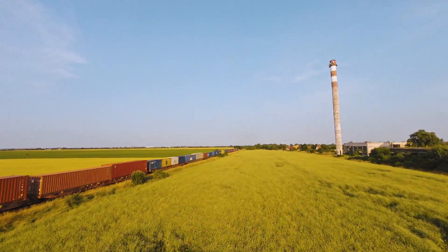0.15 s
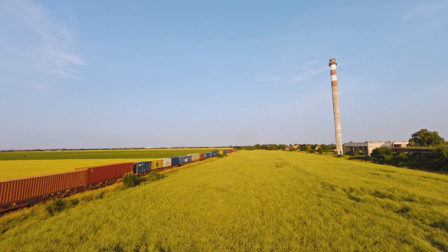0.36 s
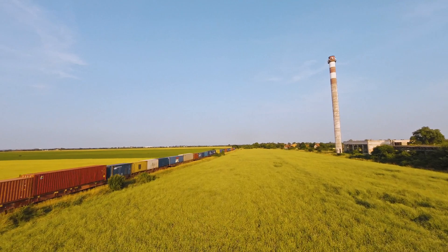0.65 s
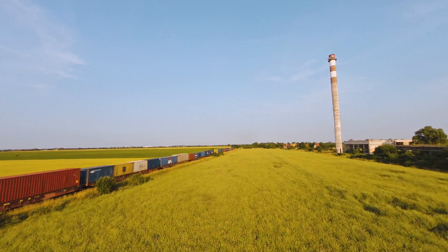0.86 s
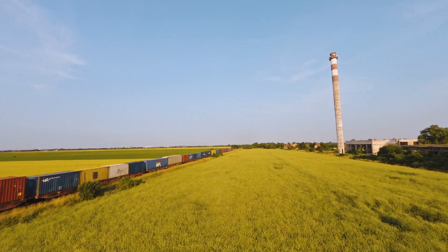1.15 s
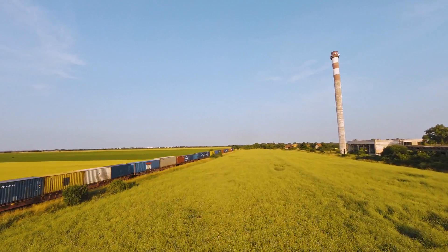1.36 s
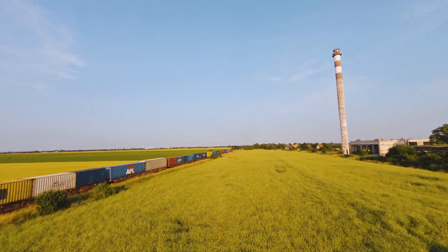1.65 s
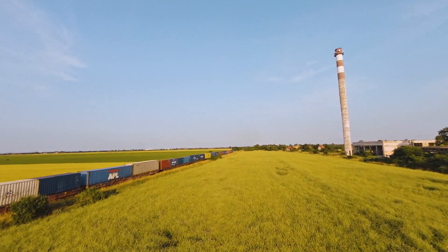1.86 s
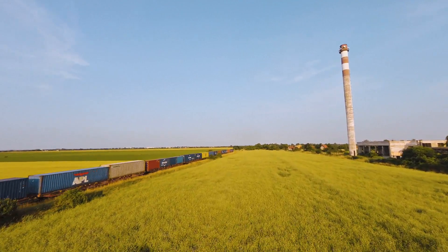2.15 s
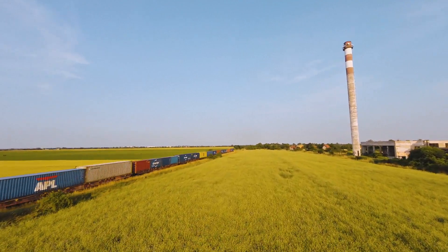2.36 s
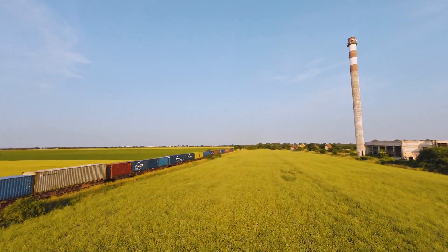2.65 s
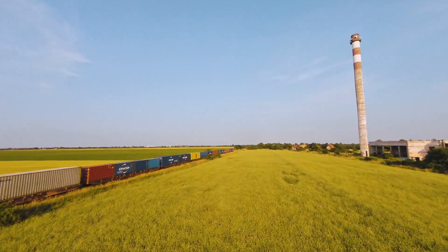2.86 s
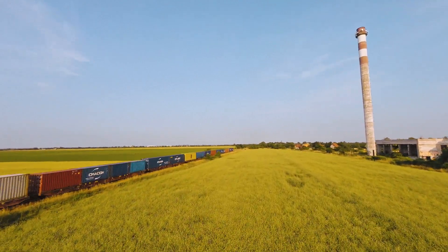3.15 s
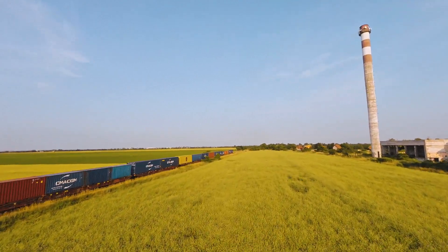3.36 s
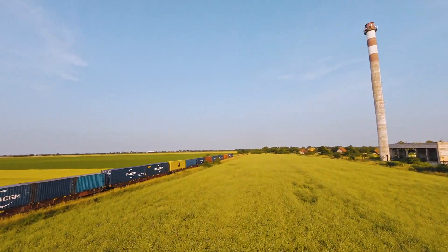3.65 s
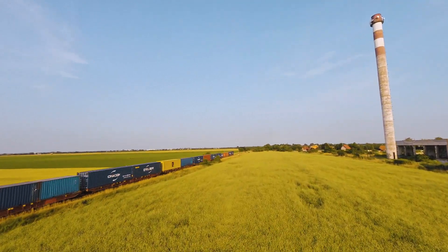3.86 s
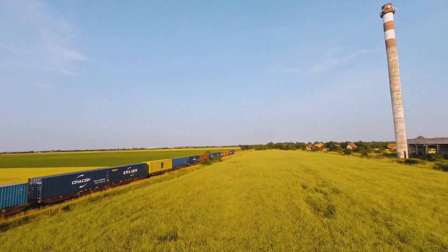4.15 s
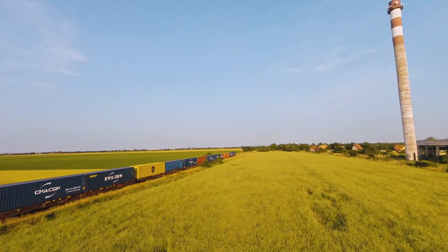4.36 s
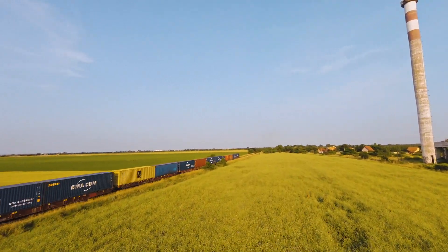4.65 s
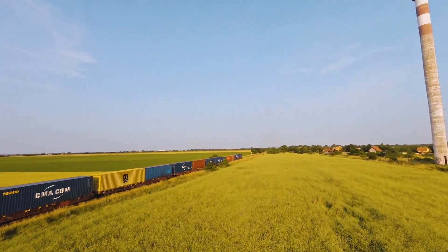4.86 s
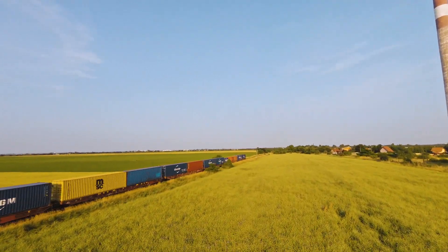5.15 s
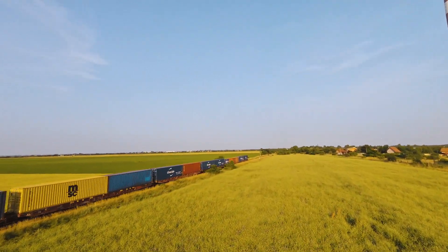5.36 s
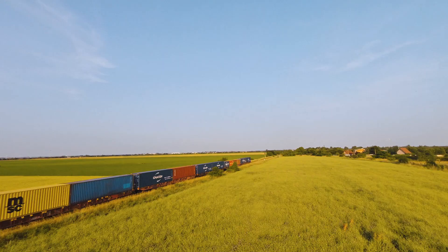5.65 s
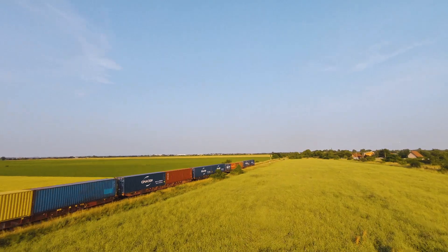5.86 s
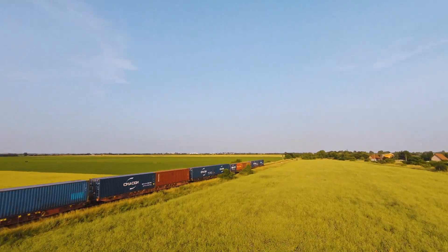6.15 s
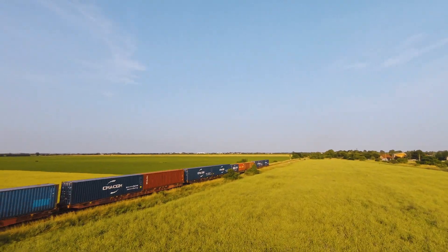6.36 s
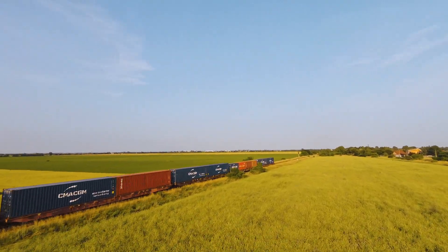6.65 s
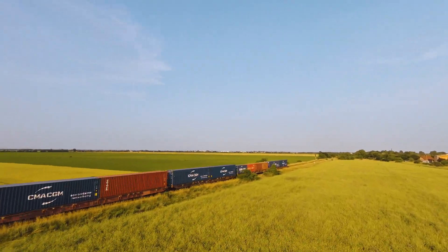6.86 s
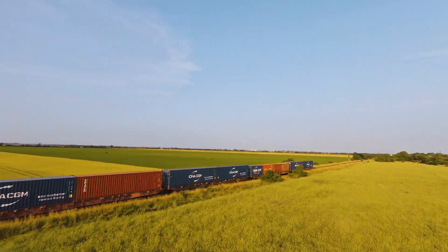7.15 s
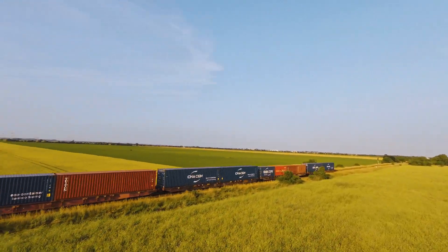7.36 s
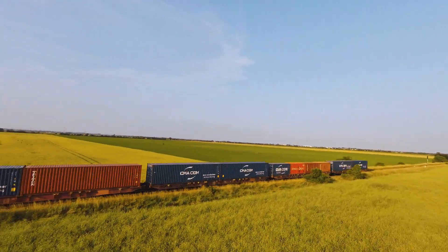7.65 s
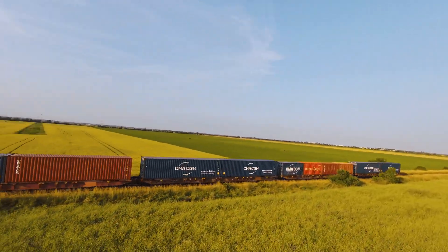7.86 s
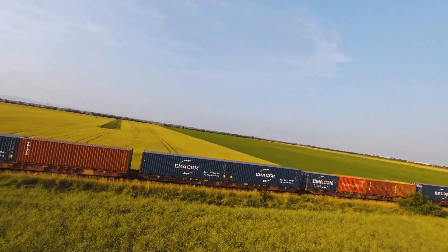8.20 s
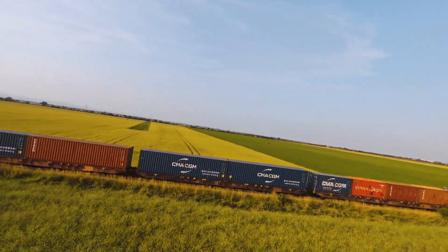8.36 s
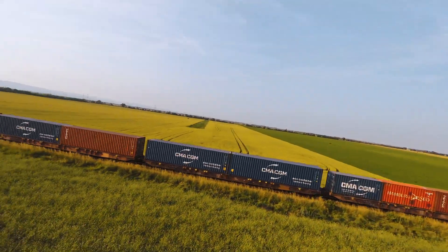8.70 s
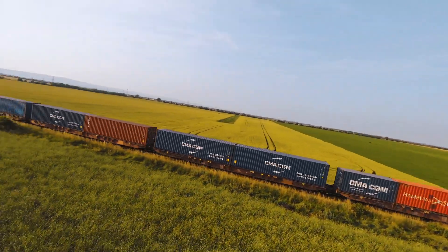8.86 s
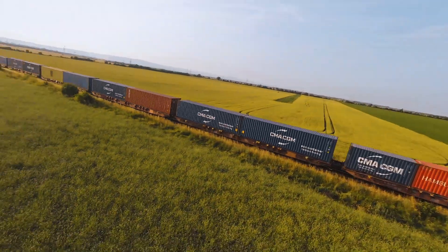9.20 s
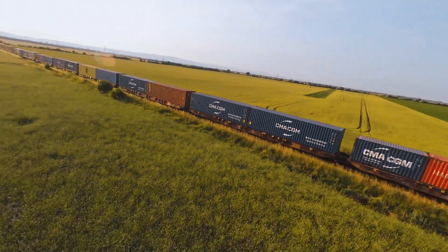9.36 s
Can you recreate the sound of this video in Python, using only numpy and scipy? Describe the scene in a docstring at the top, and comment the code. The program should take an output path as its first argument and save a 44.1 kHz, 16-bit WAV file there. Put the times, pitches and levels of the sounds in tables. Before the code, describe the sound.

Continuous, close and dense drone noise over an open field. Low rotor hums slightly out of tune make a fast throbbing flutter, squeezed by the recorder's limiter. Wash and buffeting air surround them, with occasional gusts. After about eight seconds the aircraft banks: beating changes, the blades rasp louder, treble hiss and whine rise, and one rotor climbs in pitch as the sound ends at full effort.

```python
"""Over a field, a camera rides on a small four-rotor drone that flies straight and then banks hard.
The three-blade rotors shake the frame once a turn, as sines that beat against each other.
Higher sines are the blade and motor tones; shaped noise is the air: rumble, buffeting, wash and hiss.
The recorder's limiter ducks everything on the peaks of the beats."""
import sys
import numpy as np
from scipy import signal
from scipy.fft import rfft, irfft, next_fast_len
from scipy.io import wavfile
from scipy.ndimage import uniform_filter1d, minimum_filter1d

SR = 44100
rng = np.random.default_rng(int(sys.argv[2]) if len(sys.argv) > 2 else 0)


def transcribe(u):
    """Save the signal u as a 16-bit wav file named by the first command-line argument.

    u: samples, shape (n,) or (channels, n), limited to [-1, 1]; the rate is SR.
    q: integer samples, one column per channel.
    """
    v = np.clip(np.atleast_2d(u).T, -1, 1)
    q = np.round(v * 32767).astype(np.int16)
    wavfile.write(sys.argv[1], SR, q)


N = 420273

# Shapes of the air noises. Each row: frequency in Hz, relative density in dB.
RUMBLE_SHAPE = [(15, -10), (30, -1), (60, -2), (100, -3.5), (140, -12.5), (300, -29)]
BUFFET_SHAPE = [(100, -24), (125, -10), (150, 4.5), (190, 8.5), (230, -11), (270, -24), (330, -12),
                (420, -4.5), (490, -12.5), (600, -4.5), (700, -21.5), (900, -29.5)]
WASH_SHAPE = [(500, -21.5), (700, -0.5), (930, -1), (1150, -1), (1350, -5.5), (1650, -3.5), (1900, -4),
              (2030, -10), (2300, -20), (2800, -38)]
HISS_SHAPE = [(1800, -28), (2300, -7), (2600, -2.5), (3100, 0), (3250, 3.5), (3820, -5), (4290, -8.5),
              (4750, -9), (5100, -5), (5930, -2.5), (6700, -9.5), (9520, -17), (11100, -28), (14400, -51.5),
              (15500, -60)]
# Resonances of the housing, heard in all the noises. Each row: centre in Hz, width in Hz, lift in dB.
HOUSING = [(1228, 44, 6), (1842, 71, 7), (3780, 140, 5), (7150, 470, 4)]
# Airflow in straight flight: rumble, buffet, wash, hiss and treble lift, all in dB, before gusts; the hiss
# always sounds 2 dB above its value here.
AIR_DB = [-29, -19, -31, -40, -0.3]
# What the full turn adds to those five, in dB.
AIR_TURN_DB = [8.5, 0, 1, 3, 2.5]
# Gusts and lulls. Each row: middle in seconds, length in seconds, change of rumble, wash and hiss in dB.
GUSTS = [(1.46, 0.55, -4, 2, 0), (3.05, 0.43, 2.5, 1.5, 1.4), (4.1, 0.45, -0.5, -1.5, -0.5),
         (4.5, 0.44, 4, 2, 0.5), (6.614, 0.45, -1, 4.5, 1), (8.21, 0.1, -6, -2.5, -3),
         (8.777, 0.22, 6, 0.5, 1)]
# Shaft speeds. Each row: time in seconds, then turns per second of the first, second and third rotor.
SPEED = [(0.0, 205.7, 220.6, 188.1), (0.3, 204.4, 217.7, 185.2), (0.55, 204.3, 219.5, 185.7),
         (0.85, 204.9, 217.0, 187.7), (1.25, 204.3, 216.9, 189.8), (1.9, 202.8, 216.5, 188.1),
         (2.3, 203.4, 218.0, 186.7), (2.65, 202.9, 215.9, 189.3), (2.95, 209.2, 225.2, 194.4),
         (3.4, 210.1, 222.9, 195.2), (3.7, 207.7, 222.6, 192.3), (4.15, 203.5, 215.5, 190.8),
         (4.75, 203.6, 217.3, 191.5), (5.2, 204.7, 216.7, 190.1), (5.7, 206.0, 217.0, 190.9),
         (6.05, 203.3, 219.0, 186.1), (6.5, 207.5, 220.5, 186.7), (6.82, 212.0, 223.5, 180.2),
         (7.2, 209.4, 219.5, 183.1), (7.5, 208.0, 217.5, 182.9), (7.75, 210.3, 217.5, 181.2),
         (7.95, 214.0, 218.1, 181.2), (8.15, 211.6, 211.6, 185.5), (8.35, 209.4, 213.7, 189.3),
         (8.65, 210.7, 212.5, 188.5), (8.9, 211.6, 209.2, 198.4), (9.06, 216.8, 205.3, 194.5),
         (9.16, 215.0, 205.1, 194.0), (9.23, 223.0, 203.2, 196.8), (9.4, 219.5, 203.3, 200.0),
         (9.47, 215.5, 204.4, 200.5), (9.53, 219.0, 203.7, 200.5)]
# Effort. Each row: time in seconds, frame shake in dB, blade load of the three rotors in dB.
LOAD = [(0, -3, 5.5, -3, 0.5), (2.3, -3, 0, -2.5, 2), (3.3, -3, 5, -0.5, -3), (5.5, -2.5, -2.5, -3, 1.5),
        (6.5, -2.5, -3.5, -2.5, -1), (7.0, -2, 7.5, -2, 0.5), (7.9, -3.5, 9.5, 6.5, 3.5),
        (8.4, -6, 11.5, 6.5, 4.5), (8.7, -5.5, 14, 9, 6), (9.0, -5, 14, 6, 2.5), (9.53, 1, 15, 1, 4.5)]
# Once-a-turn shake of each unbalanced rotor, in dB, before the frame shake of LOAD is added.
SHAKE_DB = [-8, -9, -21.5]
# Blade tones, one list per rotor. Each row: multiple of shaft speed, level in dB before load.
BLADES = [
    [(2, -39), (3, -34), (6, -53)],
    [(2, -37.5), (3, -28.5), (4, -46.5), (5, -43.5), (6, -47)],
    [(2, -44), (3, -23.5), (6, -48), (9, -49), (10, -58), (14, -63)],
]
# Coils and magnets of the first motor. Each row: multiple of shaft speed, level in dB before the turn.
WHINE = [(7, -60), (9, -58), (12, -58.5), (15, -63)]
# Narrow frame resonances that lift tones gliding through. Each row: centre in Hz, width in Hz, lift in dB.
FRAME = [(1252, 67, 6.5), (1833, 38, 13), (3030, 100, 10.5)]

RUMBLE_EASES_DB_PER_S = 0.79  # until the turn
TURN_START_S, TURN_BITE_S = 8.09, 0.51  # the turn bites over a short time, then holds
WHINE_TURN_DB, WHINE_GROWS_DB_PER_S = 11.5, 6
FOURTH_LAG_TURNS_PER_S, FOURTH_DB = 5.8, -41  # lag behind the first rotor
FOURTH_CLIMB_START_S, FOURTH_CLIMB_TURNS_PER_S2 = 6.85, 24  # climbs for one second
FOURTH_FADE_START_S, FOURTH_FADE_DB_PER_S = 7.55, 150
STEP = 40  # slow changes are worked out at every 40th sample
TIME_S = np.arange(N) / SR


def amp(db):
    """Turns a level in dB into a gain."""
    return 10 ** (np.asarray(db) / 20)


def rms_one(x):
    """Scales a signal to an rms of 1."""
    return x / np.sqrt(np.mean(x ** 2))


def in_time(rows):
    """Draws straight lines between the rows, giving each column sample by sample."""
    s, *columns = np.transpose(rows)
    return np.array([np.interp(TIME_S, s, column) for column in columns])


def lift_db(hz, peaks):
    """Adds up the lift around each resonance: most at its centre, less to both sides."""
    total_db = 0
    for centre_hz, width_hz, peak_db in peaks:
        total_db = total_db + peak_db / (1 + (2 * (hz - centre_hz) / width_hz) ** 2)
    return total_db


def every_sample(coarse):
    """Joins the values at every 40th sample by straight lines."""
    return np.interp(np.arange(N) / STEP, np.arange(len(coarse)), coarse)


def coarse_drift(rate_hz):
    """Makes a slow random wander of spread 1: noise smoothed by two equal low-pass filters."""
    run_in = 2000  # thrown away, so that the filters have settled
    r = np.exp(-2 * np.pi * rate_hz * STEP / SR)
    noise = rng.standard_normal((N + STEP - 1) // STEP + run_in)
    return rms_one(signal.lfilter([1], [1, -2 * r, r * r], noise)[run_in:])


def drift(rate_hz):
    """Gives the slow random wander sample by sample."""
    return every_sample(coarse_drift(rate_hz))


def coloured(shape):
    """Shapes random noise by frequency, with the housing resonances added, at an rms of 1."""
    size = next_fast_len(N)
    hz = np.arange(1, size // 2 + 2) * SR / size
    shape_hz, shape_db = np.transpose(shape)
    level_db = np.interp(np.log(hz), np.log(shape_hz), shape_db, left=-80, right=-90)
    spectrum = rfft(rng.standard_normal(size)) * amp(level_db + lift_db(hz, HOUSING))
    return rms_one(irfft(spectrum, size)[:N])


def turn():
    """Tells how hard the drone banks, from 0 to 1."""
    return np.clip((TIME_S - TURN_START_S) / TURN_BITE_S, 0, 1)


def gusts():
    """Lets each gust swell and pass as a bell curve: changes in dB for rumble, wash and hiss."""
    total_db = np.zeros((3, N))
    for middle_s, length_s, *change_db in GUSTS:
        bell = np.exp(-(2 * (TIME_S - middle_s) / length_s) ** 2)
        total_db += np.outer(change_db, bell)
    return total_db


def airflow():
    """Air rumbles on the microphone port, wash buffets the shell and the blade tips hiss."""
    rumble_db, buffet_db, wash_db, hiss_db, treble_db = np.c_[AIR_DB] + np.outer(AIR_TURN_DB, turn())
    rumble_gust_db, wash_gust_db, hiss_gust_db = gusts()
    rumble_db = rumble_db + rumble_gust_db - RUMBLE_EASES_DB_PER_S * np.minimum(TIME_S, TURN_START_S)
    wash_db = wash_db + wash_gust_db
    hiss_db = hiss_db + hiss_gust_db + 2.0
    shared = drift(25)  # buffet, wash and hiss flutter together
    rumble = amp(rumble_db + 1.1 * drift(4.9)) * coloured(RUMBLE_SHAPE)
    buffet = amp(buffet_db + 0.44 * shared + 1.74 * drift(3)) * coloured(BUFFET_SHAPE)
    wash = amp(wash_db + 0.56 * shared + 0.52 * drift(50)) * coloured(WASH_SHAPE)
    hiss = coloured(HISS_SHAPE)
    treble = signal.sosfilt(signal.butter(2, 5500, "high", fs=SR, output="sos"), hiss)
    hiss = hiss + (amp(treble_db) - 1) * treble
    return rumble + buffet + wash + amp(hiss_db + 0.67 * shared) * hiss


def tone(angle, hz, level_db, flutter_db=2.0):
    """A sine whose level flutters in turbulence and swells in the frame resonances."""
    steady_db = np.broadcast_to(level_db, N)[::STEP] + lift_db(hz[::STEP], FRAME)
    level = every_sample(amp(steady_db + flutter_db * coarse_drift(13.2)))
    return np.sqrt(2) * level * np.sin(angle)


def shaft_angle(turns_per_s, wobble):
    """Adds up the turning, in radians, with a random wobble of the given spread in radians."""
    return 2 * np.pi * np.cumsum(turns_per_s) / SR + wobble * drift(6)


def fourth_rotor(first_speed):
    """One tone at six times a shaft speed that lags the first rotor, then climbs and fades."""
    climb = FOURTH_CLIMB_TURNS_PER_S2 * np.clip(TIME_S - FOURTH_CLIMB_START_S, 0, 1)
    hz = 6 * (first_speed - FOURTH_LAG_TURNS_PER_S + climb)
    level_db = FOURTH_DB - FOURTH_FADE_DB_PER_S * np.maximum(TIME_S - FOURTH_FADE_START_S, 0)
    return tone(shaft_angle(hz, wobble=0.4), hz, level_db)


def combination_tone(angles, speed):
    """The two strong shakes mix: once the first shaft speed plus twice the second."""
    return tone(angles[0] + 2 * angles[1], speed[0] + 2 * speed[1], -35.0, flutter_db=5.5)


def upper_tone(order, angle, shaft_speed, level_db):
    """A multiple of the shaft speed, blurred by eddies, the high multiples most."""
    slip = rng.uniform(0, 2 * np.pi) + 0.08 * order * drift(14)
    return tone(order * angle + slip, order * shaft_speed, level_db)


def blade_tones(k, angle, shaft_speed, load_db):
    """Blades chop the air: with three of them, load acts fully on multiples of three."""
    out = np.zeros(N)
    for order, level_db in BLADES[k]:
        share = 1 if order % 3 == 0 else 0.4
        out += upper_tone(order, angle, shaft_speed, level_db + share * load_db)
    return out


def motor_whine(angle, shaft_speed):
    """Coils passing magnets whine, and the whine grows with current in the turn."""
    growth_db = turn() * (WHINE_TURN_DB + WHINE_GROWS_DB_PER_S * (TIME_S - TURN_START_S))
    return sum(upper_tone(order, angle, shaft_speed, level_db + growth_db) for order, level_db in WHINE)


def rotors():
    """Each unbalanced rotor shakes the frame once a turn, with blade and motor tones on top."""
    speed = in_time(SPEED)
    shake_db, *load_db = in_time(LOAD)
    # the wobble is the flight controller's quick speed corrections
    angles = [shaft_angle(shaft_speed, wobble=0.06) for shaft_speed in speed]
    out = fourth_rotor(speed[0]) + combination_tone(angles, speed)
    out += motor_whine(angles[0], speed[0])
    for k in range(3):
        out += blade_tones(k, angles[k], speed[k], load_db[k])
        out += tone(angles[k], speed[k], SHAKE_DB[k] + shake_db)
    return out


def scene():
    """Everything reaches one microphone inside the camera."""
    return (airflow() + rotors())[None]


def record(dry):
    """A look-ahead limiter turns down the peaks and recovers steadily; then the top is cut."""
    drive_db, ceiling_db, release_db_per_s = 0.9, -0.8, 90
    ahead = round(0.004 * SR)  # 4 ms in samples
    over_db = np.maximum(20 * np.log10(np.abs(dry[0]) + 1e-6) + drive_db - ceiling_db, 0)
    # each peak is held and let go at the release rate
    fall_db = release_db_per_s * TIME_S
    held_db = np.maximum.accumulate(over_db + fall_db) - fall_db
    # the cut is widened, then smoothed twice, so that it is complete when the peak arrives
    cut_db = -minimum_filter1d(-held_db, size=2 * ahead)
    cut_db = uniform_filter1d(cut_db, size=ahead)
    cut_db = uniform_filter1d(cut_db, size=ahead)
    limited = amp(drive_db - cut_db) * dry
    top_cut = signal.cheby2(10, 50, 15500, fs=SR, output="sos")  # low-pass, 50 dB down from 15500 Hz
    return signal.sosfilt(top_cut, limited)


dry = scene()
out = record(dry)
transcribe(out)
```